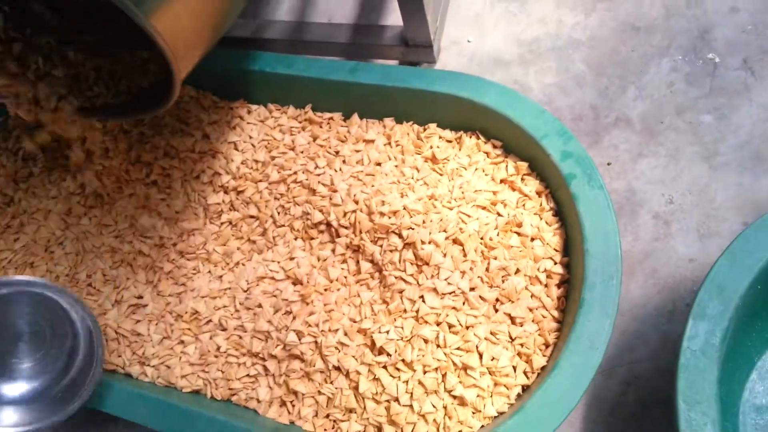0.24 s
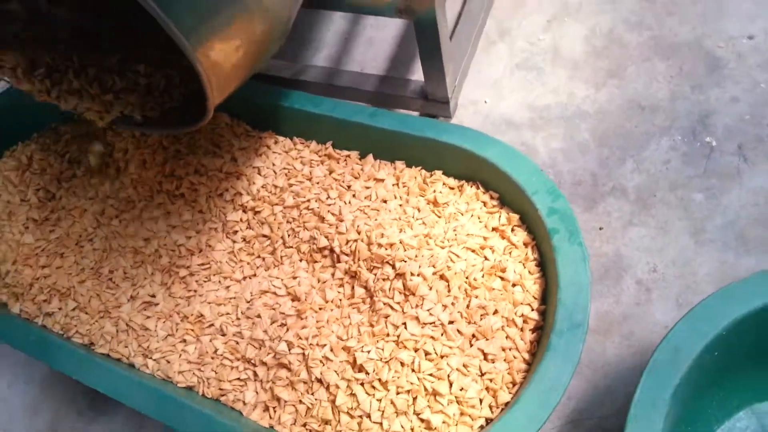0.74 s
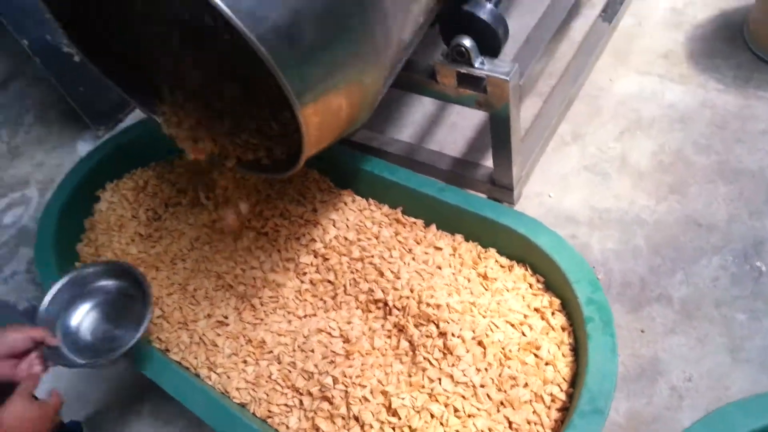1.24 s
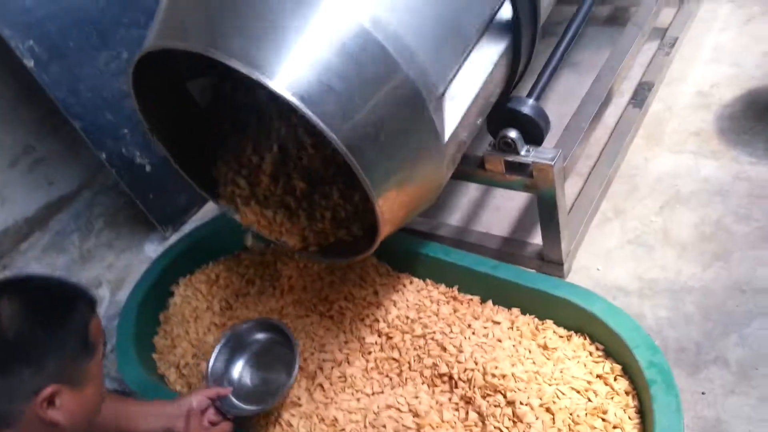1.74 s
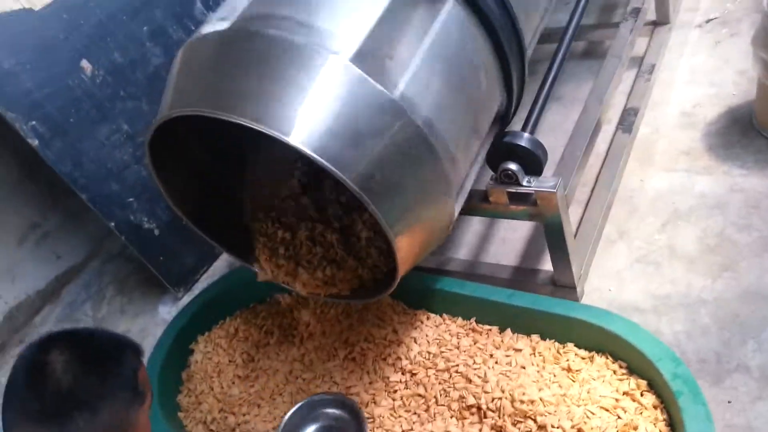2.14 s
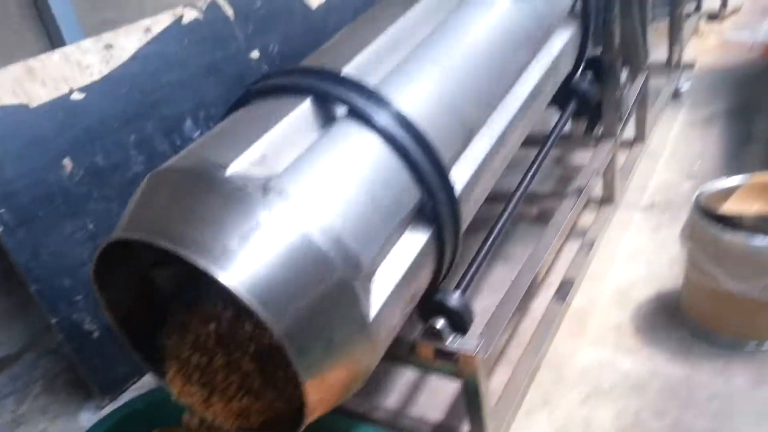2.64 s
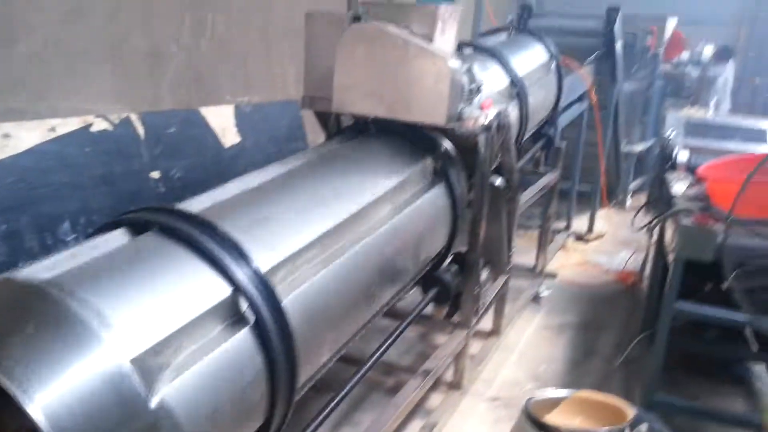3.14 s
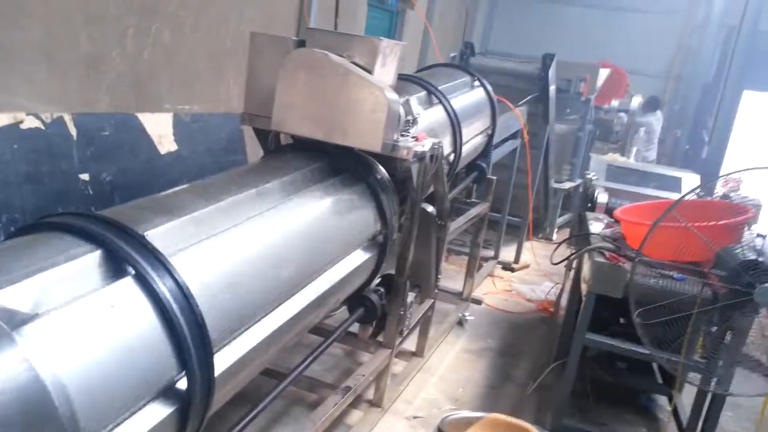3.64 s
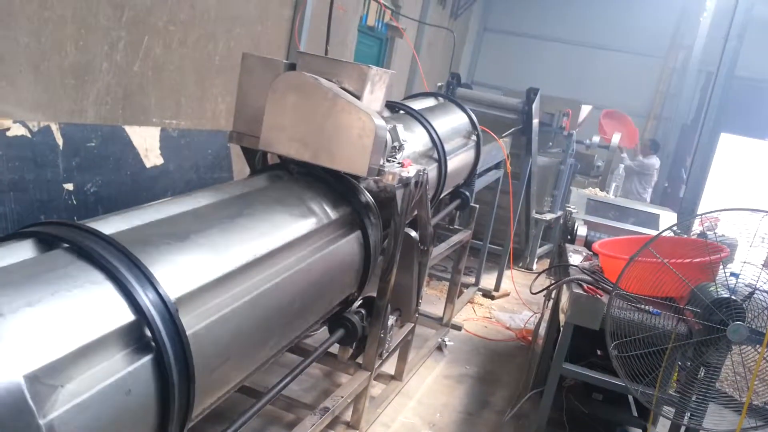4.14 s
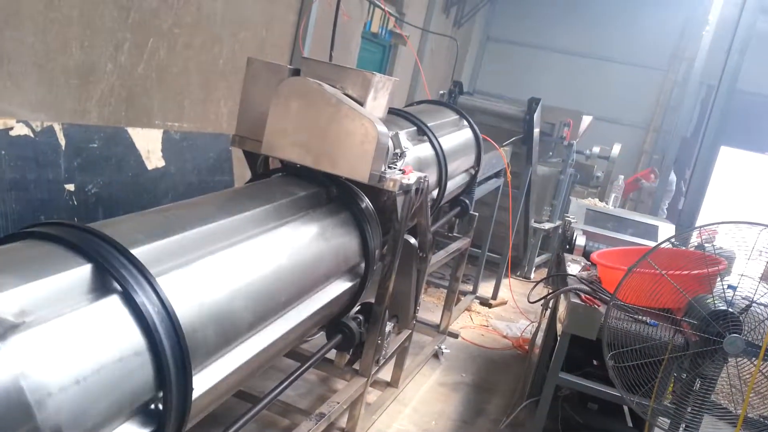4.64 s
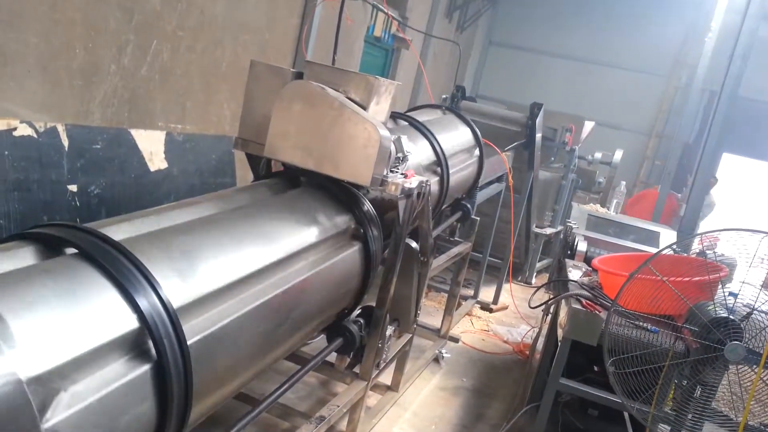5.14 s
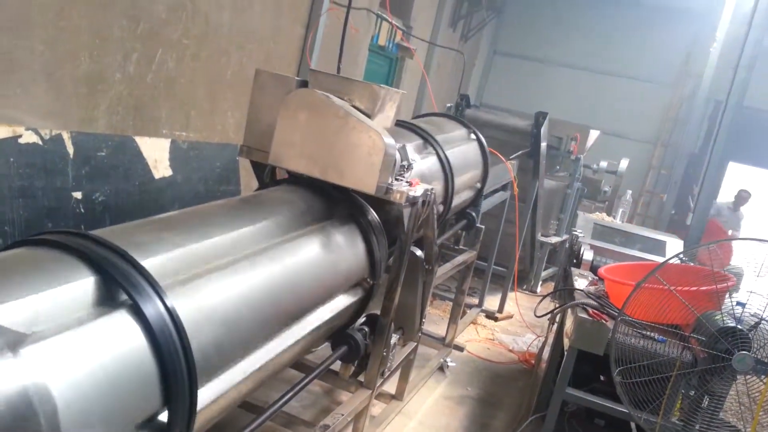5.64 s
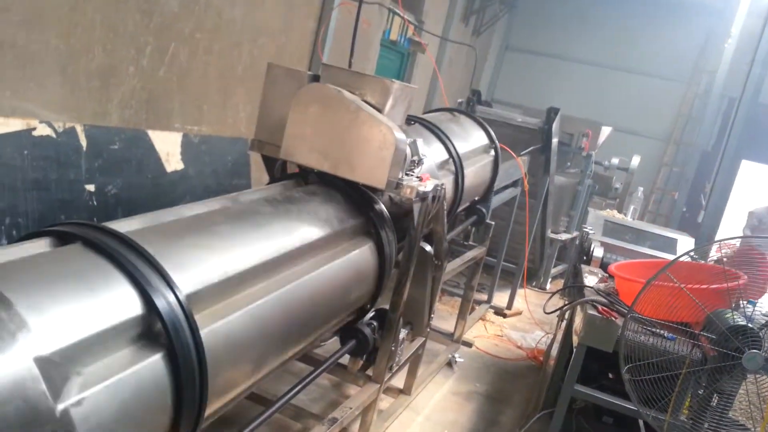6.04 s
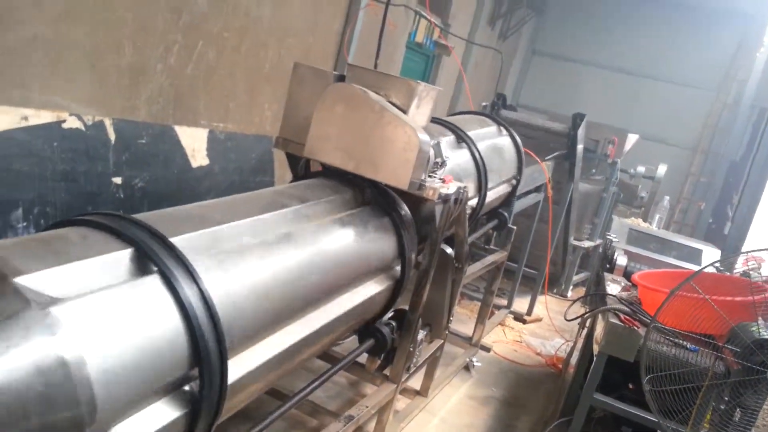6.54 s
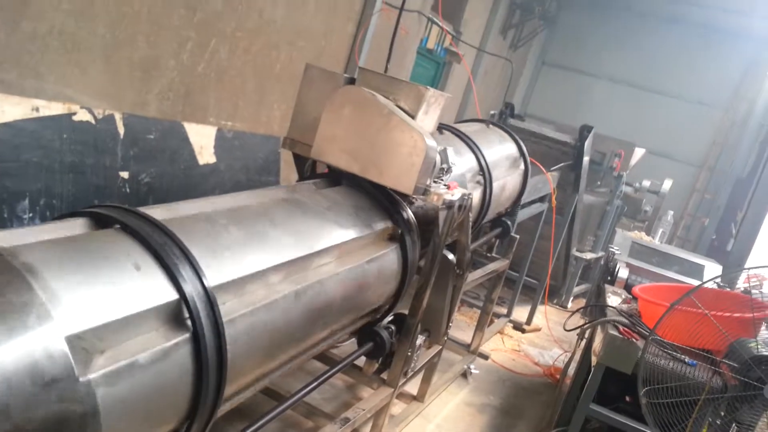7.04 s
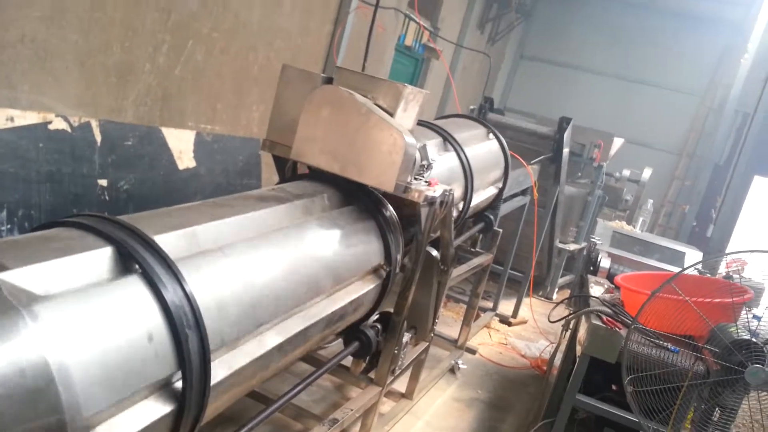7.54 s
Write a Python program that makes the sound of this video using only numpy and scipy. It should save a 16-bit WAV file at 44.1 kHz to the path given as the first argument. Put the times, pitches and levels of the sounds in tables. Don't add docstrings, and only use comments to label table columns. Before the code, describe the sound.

In a loud, hard-walled workshop, thousands of crisp pellets rattle continuously inside a turning steel drum and spill into a tub. Hollow booms come from the drum mouth, strongest around two seconds. Behind, a motor-driven shaker buzzes, its tones swelling and fading while the microphone swings along the drum, then holding steady after about three seconds. Close stereo microphones, thin in the bass, with a few tiny ticks at right.

```python
import sys
import numpy as np
from scipy import signal
from scipy.fft import irfft
from scipy.io import wavfile
from scipy.ndimage import map_coordinates

SR = 44100
rng = np.random.default_rng(int(sys.argv[2]) if len(sys.argv) > 2 else 0)


def store_wav(level_fs):
    pcm = np.round(np.clip(np.atleast_2d(level_fs), -1, 1) * 32767)
    wavfile.write(sys.argv[1], SR, pcm.T.astype(np.int16))


def invert_db(level):
    return 10 ** (np.asarray(level, dtype=float) / 20)


N = 343971

# (time [s], level [dB])
POUR = [(0, -15), (.45, -16), (.7, -15), (1.0, -16.5), (1.65, -16.5), (1.95, -16), (2.65, -16.5),
        (2.9, -16), (3.45, -16.5), (3.8, -15.5), (4.3, -16.5), (4.85, -16), (5.3, -16.5), (6.2, -16),
        (6.75, -15.5), (7.3, -16), (7.8, -15.5)]
# (time [s], boom level [dB], rumble rise [dB], length [s])
DUMPS = [
    (0.0, -17.5, 2, 0.26),
    (.33, -28, 4.5, .25),
    (0.618, -20.5, -0.5, 0.23),
    (1.467, -32, 7, 0.11),
    (1.985, -15, 3.5, 0.28),
    (2.27, -17.5, 4, .3),
    (2.535, -18, 4, .1),
    (5.576, -29, 1, .2),
    (7.47, -18, 1, .1),
    (7.761, -24, 3, .1),
]
# (time [s], motion [m/s], facing the drum mouth [0-1], distance to the pour [m])
LISTENER = [(0, 0.94, 0.8, 1.76), (.5, 0.74, 0.82, 1.44), (1.1, 0.65, 0.6, 1.34), (1.5, .62, 0.88, 1.18),
            (2.4, 0.71, 0.92, 1.27), (2.8, 0.55, 0.86, 1.25), (3.1, 0.273, 0.31, 1.42),
            (3.7, 0.091, .3, 1.66), (5.2, .04, 0.2, 1.8), (6.5, 0.044, 0, 2.12), (7.8, .045, .1, 2.04)]
# (frequency [Hz], level [dB])
RATTLE = [(140, -26), (280, -11.5), (420, -8), (520, -14), (640, -7.5), (900, -4.5), (1330, -2),
          (3300, -1.5), (4500, -5), (5300, -16), (6300, -22), (8000, -23), (11000, -31.5), (14500, -51)]
# (frequency [Hz], width [Hz], level [dB])
MOUTH = [(620, 200, -5), (770, 200, 0)]
# (frequency [Hz], correlation [-1 to 1])
LIKENESS = [(100, 0.36), (300, 0.91), (650, 0.61), (900, 0.37), (1200, 0.13), (1600, -0.2), (2500, 0.067),
            (8000, -0.038)]
# (frequency [Hz], left minus right [dB])
LEFT_BIAS = [(200, -0.5), (1000, -1.5), (3000, 0.5), (5000, -3), (9000, -1), (11500, 10), (14000, 42)]
# (time [s], peak level [dB])
TICKS = [
    (1.0061, -25),
    (3.023, -36),
    (4.1194, -33),
    (4.9516, -34),
    (5.3192, -37),
]
# (frequency [Hz], level of each [dB rms])
BUZZ = [(150, -74), (300, -58.5), (600, -35), (1100, -33.5), (2000, -30.5), (3000, -32.5), (4500, -38.5),
        (6000, -46), (7500, -52.5)]
# (multiple of the shaft rate, left level [dB], right level [dB], likeness [-1 to 1])
STANDING = [(8, -49, -48, 1.0), (12, -50, -48, 1.0), (14, -46, -48, 1.0), (16, -47, -46, 0.9),
            (24, -38, -38, 1.0), (26, -37, -48, 0.9), (28, -37, -38, 0.9), (30, -40, -47, 1.0),
            (31, -40, -44, 1.0), (35, -30, -34, 1.0), (40, -32, -33, 1.0), (42, -40, -29, -0.1),
            (46, -32, -35, 0.8), (50, -31, -34, 0.2), (55, -32, -41, -1.0), (61, -31, -39, 0.6),
            (62, -38, -31, 0.3), (63, -31, -29, 0.9), (64, -35, -32, 0.0), (66, -40, -32, -1.0),
            (68, -26, -30, -0.5), (74, -33, -31, -1.0), (75, -34, -32, -0.3), (82, -35, -31, 0.8),
            (86, -32, -36, -0.6), (88, -30, -35, 0.9), (93, -32, -33, 0.4), (100, -30, -34, 1.0)]
# (multiple of the shaft rate, level while turning [dB],
# antinode reached [s], level once settled [dB], creep after [dB/s])
WHINE = [(18, -35.5, 2.85, -30, -.3), (30, -36, 3.2, -45, 1.5), (34, -36, 3.2, -24.5, -.6),
         (36, -38, 2.82, -22.5, 1.7), (44, -42, 3.6, -38, .3)]
# (time [s], multiple of the shaft
# rate, level [dB], likeness [-1 to 1], length [s])
PASSING = [(.35, 12, -38, .9, .5), (.4, 8, -41, 1, .35), (.72, 30, -28.5, .9, .75), (.75, 36, -30, .8, .7),
           (.8, 44, -26, .8, .65), (.97, 18, -30, .8, 1.1), (1.08, 25, -35, 1, 1.15),
           (1.08, 40, -32, .9, 1.25), (1.15, 45, -28, .8, .7), (1.25, 35, -29, .9, .9),
           (1.4, 34, -32, .8, .5), (1.4, 69, -30, -.9, .5), (1.65, 90, -31, -.9, .8),
           (1.85, 26, -32, 1, 1.3), (1.78, 31, -31, 1, .75), (1.83, 48, -32, .8, 1.15),
           (2.05, 32, -31, .9, .5), (2.08, 28, -33, 1, 1.15), (2.25, 29, -31, 1, .5),
           (2.35, 44, -32, .8, .5), (2.4, 30, -27, .9, .85), (2.62, 39, -32, .3, .85),
           (2.92, 59, -31, -.9, 1.15), (3.3, 84, -28, -.2, .7),
           (1.98, 8, -64, 1, .3), (.45, 47, -28, .8, .3), (.85, 20, -46, 1, .7), (5.75, 94, -29, .9, .6),
           (7.55, 61, -27, .9, .5), (2.95, 42, -30, .8, .7), (3.7, 100, -40, 1, 2.4),
           (4.0, 88, -43, .9, 1.8), (6.45, 88, -27, .9, .7), (6.8, 63, -44, .9, 2.2),
           (7.0, 100, -28, 1, 1.6), (6.7, 68, -40, -1, .5)]

RATTLE_DB, RATTLE_FOLLOWS = -14, 1.7
RUMBLE_DB, RUMBLE_FOLLOWS = -34, 0.19
SIZZLE_DB, SIZZLE_FOLLOWS = -24, 0.44
RATTLE_FADES = 0.43
BOOM_FACING_DB, BOOM_AWAY_DB = -26.5, -40
PULSE_GAP_S = .0035
SHAFT_HZ = 24.808
CYCLE, FRAME_S = 4096, .05
BUZZ_DB, BUZZ_RISE_DB_PER_S = -4.5, 0.27
MOUTH_LIFT_DB, MOUTH_SHADE_DB = 4.5, -16.5
EVENING_FROM_S, EVENING_DB_PER_S, UNEVEN_DB = 5, -4.5, 0
LOWEST_FLIP_S, LOWEST_FLIP_SPAN_S = 1.94, .7
SETTLING_S, CREEP_FROM_S, CREEP_LASTS_S = .3, 3.9, 2.3
WHINE_WOBBLE_DB = .6


def pellets(hits_per_s, spread_db, patchy_db):
    s = np.arange(N) / SR
    shape = (2, 2, N)
    struck = rng.random(shape) < hits_per_s * invert_db(1.5 * drift(9)) / SR
    strength = invert_db(spread_db * rng.exponential(1, shape))
    hits = struck * strength * rng.choice([-1, 1], shape)
    smear = rng.standard_normal(shape)
    source = smear + 0.31 * rms_one(hits)
    along_drum = np.clip((s - 2.6) / 2.0, 0, 1)
    groups = np.zeros((4, 2, N))
    together = drift(5)
    edges = 120 * 2 ** (np.arange(0, 22) / 3)
    for k, (low, high) in enumerate(zip(edges, edges[1:])):
        band = signal.butter(2, [low, high], "band", fs=SR, output="sos")
        mid, side = signal.sosfilt(band, source[k % 2])
        hz = np.sqrt(low * high)
        flicker_db = patchy_db * np.log(hz / 400) * (0.45 * together + 0.61 * drift(9.6))
        ring_db = 2.95 / (1 + ((hz - 2300) / 500) ** 4)
        dull_db = 2.0 / (1 + ((hz - 5000) / 900) ** 4)
        shell_db = along_drum * (ring_db - dull_db)
        bias_db = at_hz(LEFT_BIAS, hz) * np.array([[.5], [-.5]])
        level = invert_db(at_hz(RATTLE, hz) + flicker_db + shell_db + bias_db)
        group = int(hz > 500) + int(hz > 5500) + int(hz > 11500)
        groups[group] += level * pair(mid, side, at_hz(LIKENESS, hz))
    levels_db = pour_levels(s) + [-45 + 5.6 * along_drum]
    load = sum(invert_db(level_db) * rms_one(g) for level_db, g in zip(levels_db, groups))
    return load + mouth_boom(source[0], s)


def pour_levels(s):
    pour_db, = in_time(POUR, s)
    pour_db = pour_db - pour_db.mean()
    distance_m = in_time(LISTENER, s)[2]
    loss_db = 20 * np.log10(distance_m)
    dump_db = sum(rise_db * swell(s, at, length) for at, _, rise_db, length in DUMPS)
    rumble_db = RUMBLE_DB + RUMBLE_FOLLOWS * pour_db + dump_db
    rattle_db = RATTLE_DB + RATTLE_FOLLOWS * pour_db - RATTLE_FADES * (loss_db - loss_db.mean())
    sizzle_db = SIZZLE_DB + SIZZLE_FOLLOWS * pour_db - loss_db
    return [rumble_db, rattle_db, sizzle_db]


def mouth_boom(source, s):
    toward_mouth = in_time(LISTENER, s)[1]
    booming = invert_db(BOOM_AWAY_DB + (BOOM_FACING_DB - BOOM_AWAY_DB) * toward_mouth)
    booming = booming + sum(invert_db(boom_db) * swell(s, at, length) for at, boom_db, _, length in DUMPS)
    boom = 0
    for hz, width_hz, level_db in MOUTH:
        r = np.exp(-np.pi * width_hz / SR)
        poles = [1, -2 * r * np.cos(2 * np.pi * hz / SR), r * r]
        boom = boom + invert_db(level_db) * signal.lfilter([1, 0, -1], poles, source)
    return booming * invert_db(-8 + 2.5 * drift(19)) * rms_one(pair(*boom, 0.92))


def ticks():
    clicks = np.zeros(N)
    for pulse in range(4):
        for at, peak_db in TICKS:
            clicks[round((at + pulse * PULSE_GAP_S) * SR)] = invert_db(peak_db + 26 - 1.5 * abs(pulse - 1))
    band = signal.butter(2, [13200, 15500], "band", fs=SR, output="sos")
    bright = signal.sosfilt(band, clicks + 1e-18)
    return bright * invert_db(np.array([[-14], [0]]))


def shaker():
    s, multiple = np.arange(0, N / SR + 2 * FRAME_S, FRAME_S), np.arange(1, 320)
    motion, facing, _ = in_time(LISTENER, s)
    still = np.clip(1.5 - np.abs(motion) / .35, 0, 1)
    hz, path_m = multiple * SHAFT_HZ, np.cumsum(np.abs(motion)) * FRAME_S
    waves = pair(hall_waves(path_m, hz), hall_waves(path_m, hz), at_hz(LIKENESS, hz))
    mouth_db = MOUTH_SHADE_DB + (MOUTH_LIFT_DB - MOUTH_SHADE_DB) * facing
    lift_db = mouth_db[:, None] / (1 + ((hz - 760) / 160) ** 4)
    buzz_db = BUZZ_DB + BUZZ_RISE_DB_PER_S * s
    partials = waves * invert_db(at_hz(BUZZ, hz) + buzz_db[:, None] + lift_db)
    for k, left_db, right_db, alike in STANDING:
        share = np.maximum(still, 1.0 * (k < 10))
        partials[:, :, k - 1] = hold(partials, k, left_db, right_db, alike, share)
    uneven_db = UNEVEN_DB + EVENING_DB_PER_S * np.maximum(s - EVENING_FROM_S, 0)
    partials = partials * invert_db(np.minimum(uneven_db, 1)[:, None] * (multiple % 2))
    whine(partials, s, still)
    for at, k, level_db, alike, length in PASSING:
        crossing = np.exp(-(2 * (s - at) / length) ** 4)
        partials[:, :, k - 1] = hold(partials, k, level_db - 0.7, level_db - 0.4, alike, crossing)
    turns = irfft(np.pad(partials, [(0, 0), (0, 0), (1, 0)]), CYCLE) * CYCLE / np.sqrt(2)
    t = np.arange(N) / SR
    where = [t / FRAME_S, t * SHAFT_HZ % 1 * CYCLE]
    return np.array([map_coordinates(np.hstack([c, c[:, :1]]), where, order=1) for c in turns])


def whine(partials, s, still):
    lowest_alike = 1 - 1.4 * swell(s, LOWEST_FLIP_S, 2 * LOWEST_FLIP_SPAN_S) - .25 * (1 - still)
    for row, (k, turning_db, reached_s, settled_db, creep_db) in enumerate(WHINE):
        settled = 1 / (1 + np.exp((reached_s - s) / SETTLING_S * 2))
        level_db = turning_db + (settled_db - turning_db) * settled
        level_db = level_db + creep_db * np.clip(s - CREEP_FROM_S, 0, CREEP_LASTS_S)
        level_db = level_db + WHINE_WOBBLE_DB * np.interp(s, np.arange(N) / SR, drift(2.6))
        turn = np.exp(1j * rng.uniform(0, 2 * np.pi))
        alike = lowest_alike if row == 0 else .75 + .2 * still
        partials[:, :, k - 1] = pair(turn, 1j * turn, alike) * invert_db(level_db)


def hold(partials, k, left_db, right_db, alike, share):
    lead = np.exp(1j * (rng.uniform(0, 2 * np.pi) + np.arccos(alike) * np.arange(2)))
    steady = (invert_db(np.array([left_db, right_db])) * lead)[:, None]
    return partials[:, :, k - 1] * (1 - share) + steady * share


def hall_waves(path_m, hz):
    cosine = rng.uniform(-1, 1, (6, len(hz)))
    phase = rng.uniform(0, 2 * np.pi, (6, len(hz)))
    shift = 2 * np.pi * hz / 343 * cosine * path_m[:, None, None]
    return np.exp(1j * (phase[:, :] + shift)).sum(axis=1) / np.sqrt(6)


def handling():
    band = signal.butter(2, [25, 110], "band", fs=SR, output="sos")
    low = signal.sosfilt(band, rng.standard_normal((2, N)))
    return invert_db(-78 + 3.6 * drift(6)) * rms_one(pair(*low, .9)) * invert_db(np.array([[3], [-3]]))


def rms_one(x):
    return x / np.sqrt(np.mean(x ** 2) + 1e-20)


def in_time(rows, s):
    at, *columns = np.transpose(rows)
    return [np.interp(s, at, c) for c in columns]


def at_hz(points, hz):
    table_hz, values = np.transpose(points)
    return np.interp(np.log(hz), np.log(table_hz), values)


def drift(rate):
    r = np.exp(-80 * np.pi * rate / SR)
    slow = signal.lfilter([1], [1, -2 * r, r * r], rng.standard_normal(N // 40 + 2002))[2000:]
    return np.interp(np.arange(N) / 40, np.arange(len(slow)), rms_one(slow))


def pair(mid, side, alike):
    alike = np.clip(alike, -1, 1)
    common, opposed = np.sqrt(1 + alike) * mid, np.sqrt(1 - alike) * side
    return np.array([common + opposed, common - opposed]) / np.sqrt(2)


def swell(s, at, length):
    return np.exp(-(2 * (s - at) / length) ** 2)


def scene():
    return pellets(hits_per_s=3000, spread_db=3.0, patchy_db=0.35) + ticks() + shaker()


def low_pass(x):
    return signal.sosfilt(signal.butter(12, 14650, fs=SR, output="sos"), x)


def record(dry):
    bass_cut = signal.butter(6, 170, "high", fs=SR, output="sos")
    mix = signal.sosfilt(bass_cut, dry) + handling()
    return low_pass(np.clip(mix, -1, 1))


dry = scene()
out = record(dry)
store_wav(out)
```